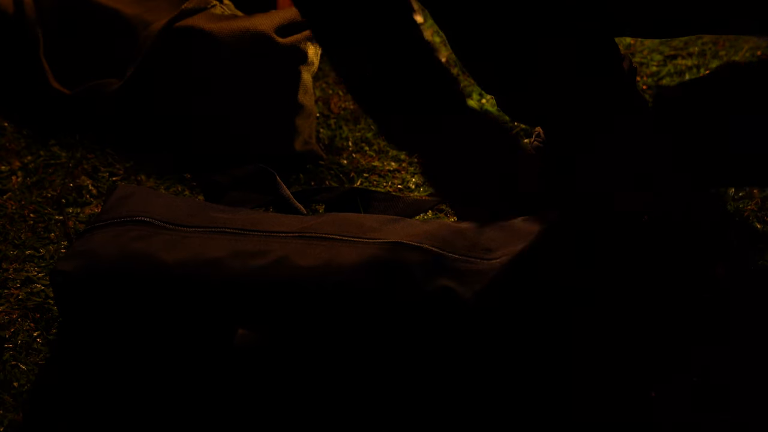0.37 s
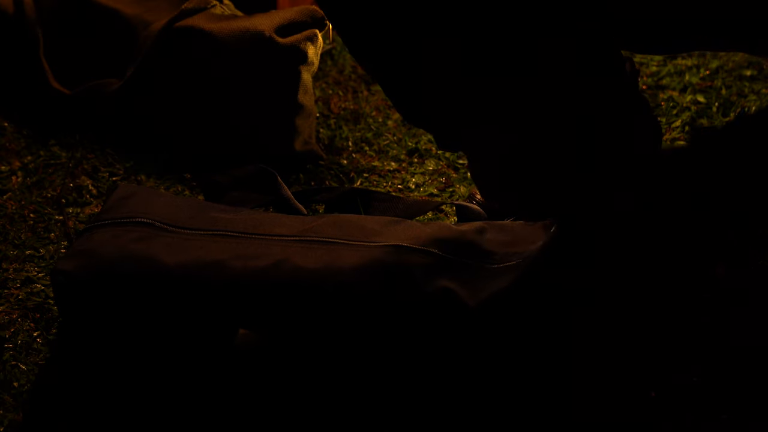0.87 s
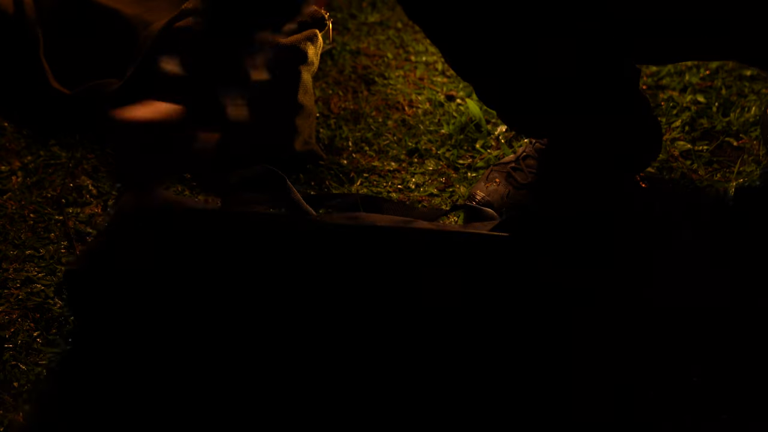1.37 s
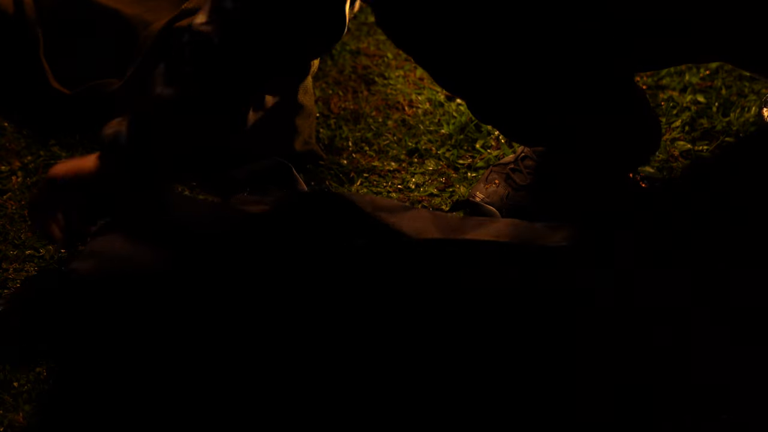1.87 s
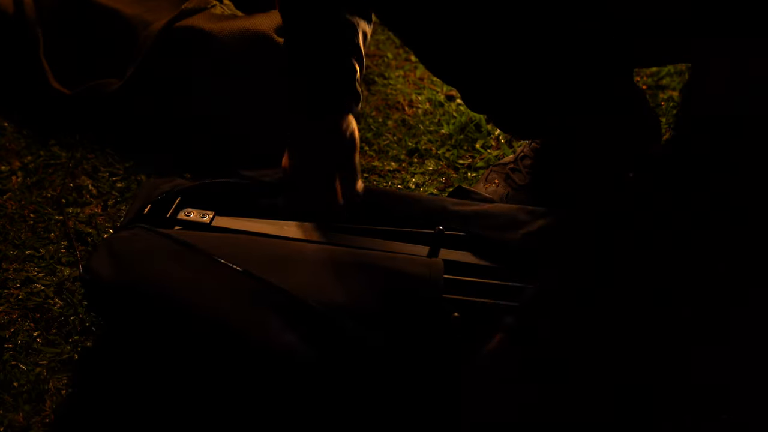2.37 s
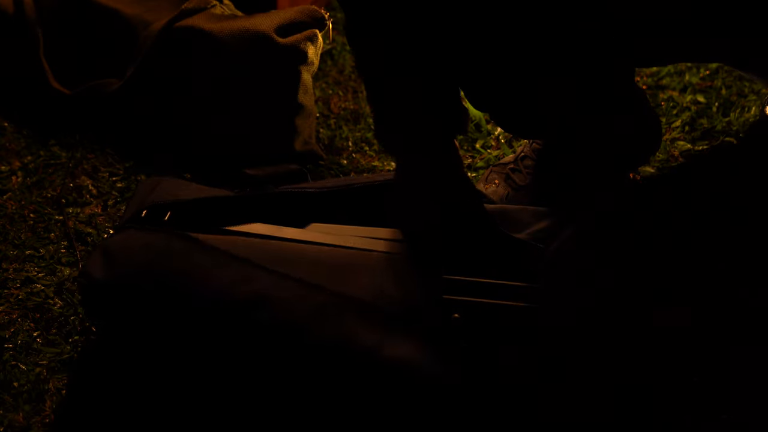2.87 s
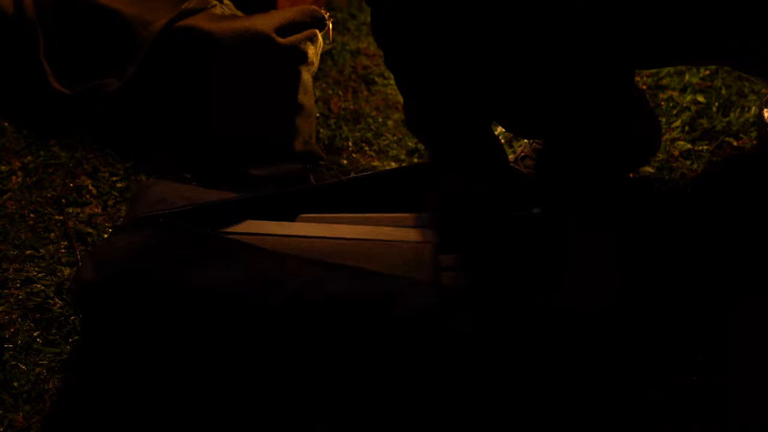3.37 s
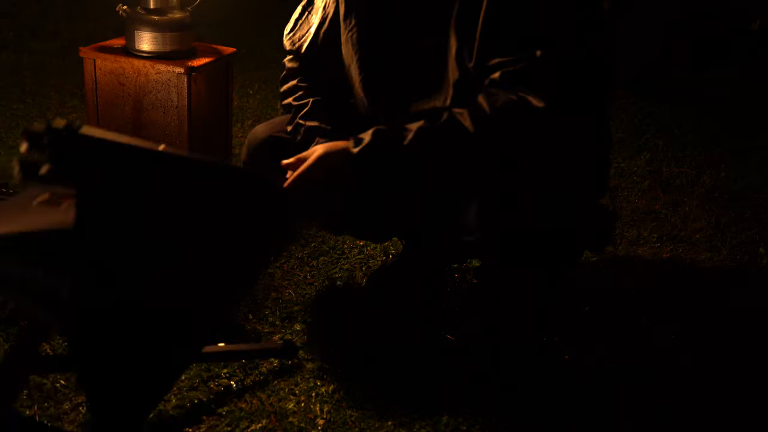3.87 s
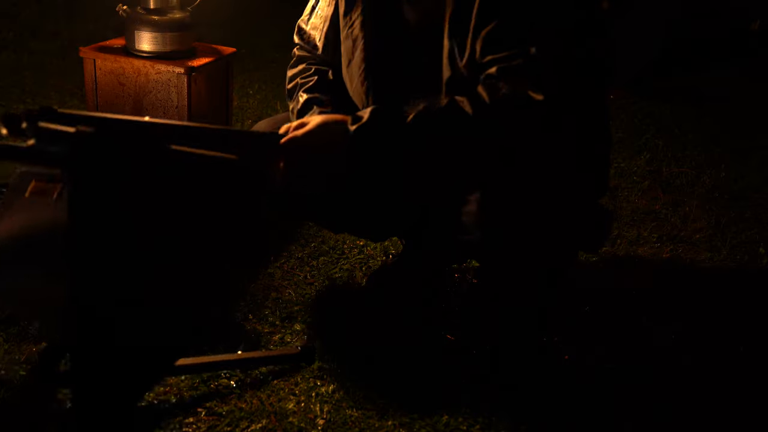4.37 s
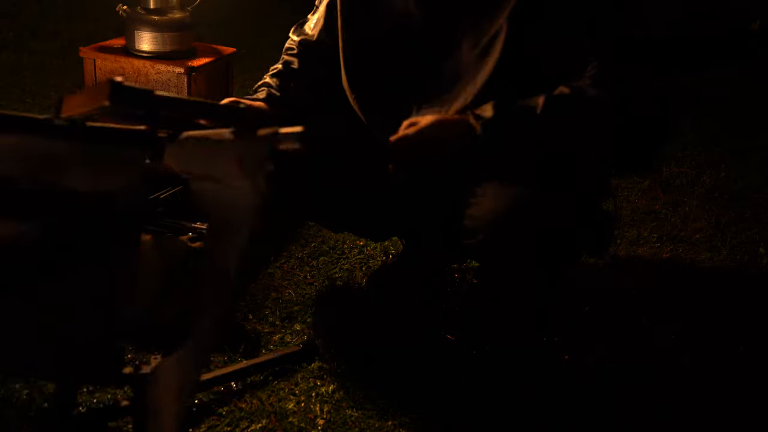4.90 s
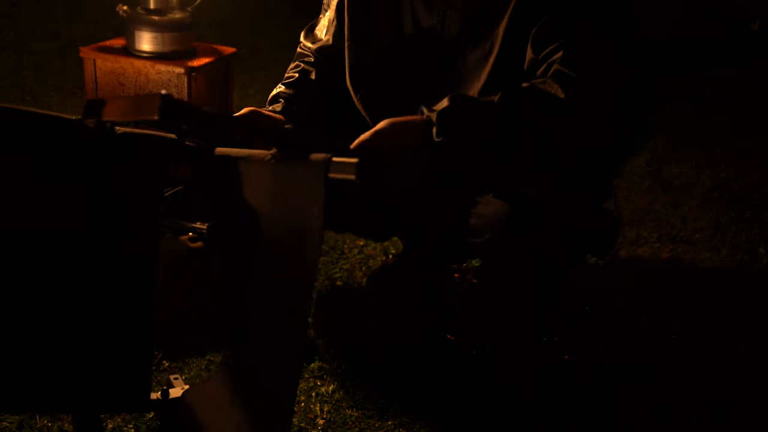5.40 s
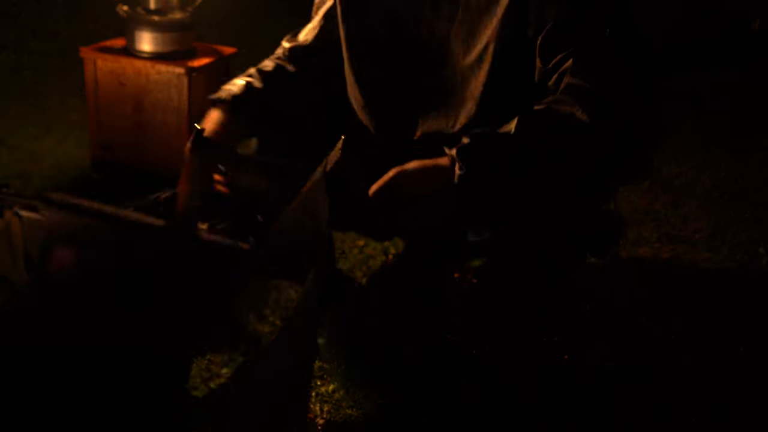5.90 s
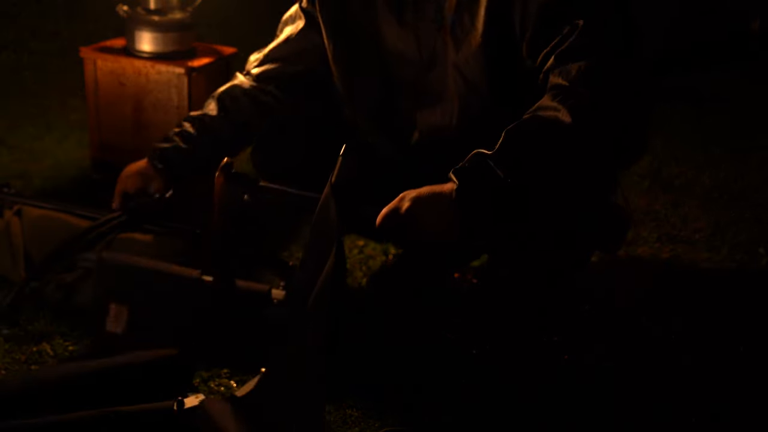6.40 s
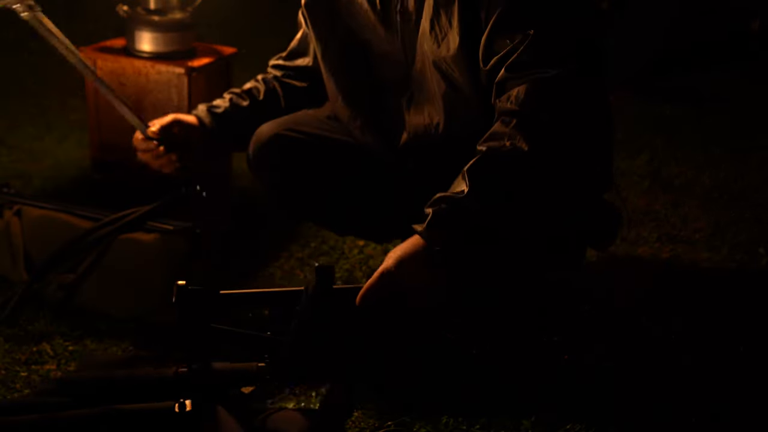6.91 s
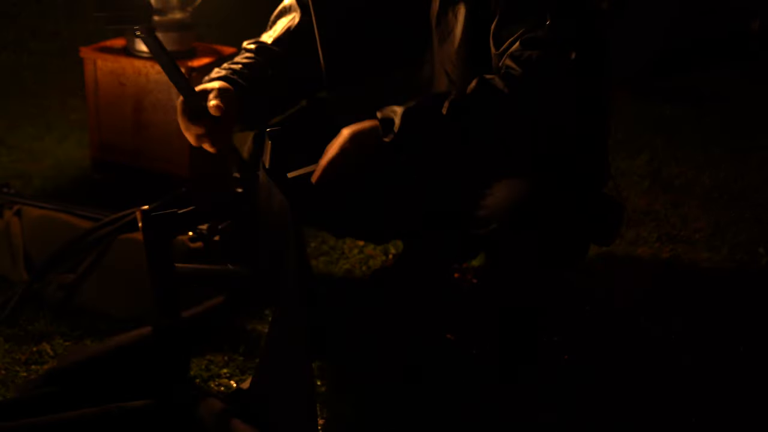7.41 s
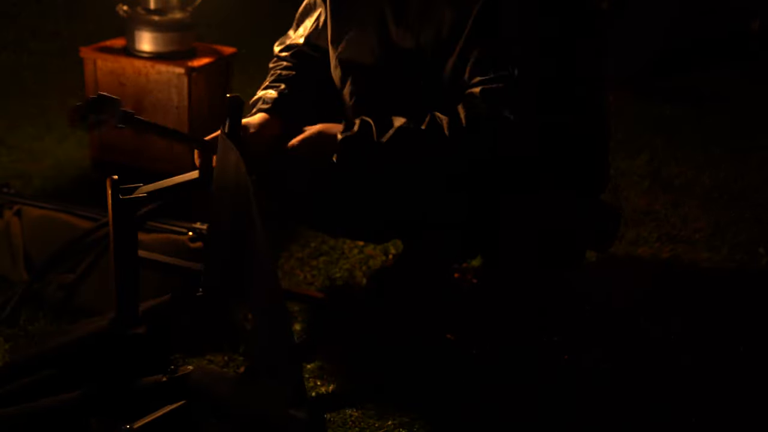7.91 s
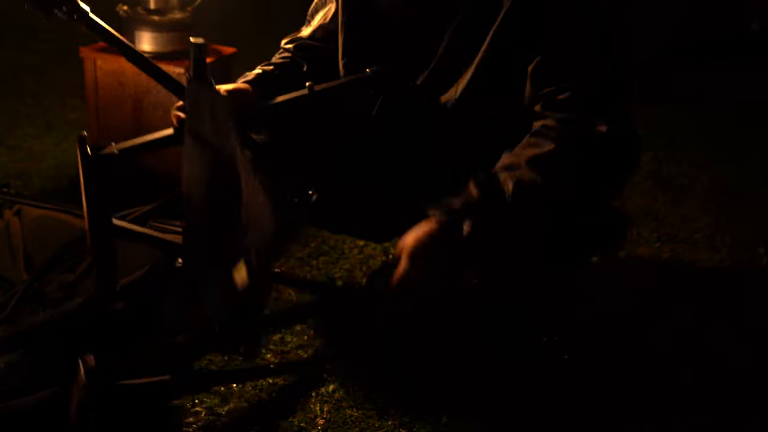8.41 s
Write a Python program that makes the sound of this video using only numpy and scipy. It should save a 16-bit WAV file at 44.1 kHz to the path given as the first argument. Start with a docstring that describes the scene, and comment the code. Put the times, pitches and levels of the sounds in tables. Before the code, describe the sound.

Quiet open night air with very faint, high trilling insects, everything close and dry. From 0.1 to 0.5 s a zip runs slowly with a low, uneven buzz and a tiny metallic tab tinkle; cloth rubs and a dull bump follows. At 1.1-1.5 s a faster zip climbs to a high whine and drops. Canvas rustles and flaps heavily from 1.2 to 4 s, with low drag rumbles. Metal pole knocks begin around 2 s, cluster sharply at 3.05 s and 3.6 s, with a heavy thump at 3.8 s. Loud ringing clacks at 4.1 s lead into a short chattering metal scrape until 4.3 s. Then it is calmer: soft rustles, bumps near 4.9 s, a bright clack at 5.4 s, another jolting scrape at 6.4-6.65 s, light knocks around 7.5-7.7 s, a crisp clack at 7.94 s, and a small tap at 8.3 s amid cloth.

```python
"""Camping gear at night

Camping gear is handled outdoors, close to a small microphone, over night air with faint insects.
Filtered noise and clicks make the air, the rubbing cloth and the gear dragged over the ground.
Tones and tooth clicks make two zips run along a canvas bag; dull bumps are short damped notes.
Metal chair poles knock together and scrape through their sockets: noise and ringing resonances."""
import sys
import numpy as np
from scipy import signal
from scipy.fft import rfft, irfft
from scipy.io import wavfile
from scipy.ndimage import uniform_filter1d

SR = 44100
rng = np.random.default_rng(int(sys.argv[2]) if len(sys.argv) > 2 else 0)


def log_audio(samples):
    """Write samples as a 16-bit WAV file to the path given in sys.argv[1]."""
    # one column per channel
    frames = np.atleast_2d(samples).T
    # limit to full scale, then quantise
    limited = np.clip(frames, -1, 1)
    pcm = np.round(limited * 32767).astype(np.int16)
    wavfile.write(sys.argv[1], SR, pcm)


def rack_gain(trim_db):
    """Turn a fader trim in dB into the linear factor to multiply a signal by."""
    fader = np.asarray(trim_db, float)
    return 10 ** (fader / 20)


N = 375732
TIME = np.arange(N) / SR

# colour of rubbing cloth, also of the crack of a blow: (frequency [Hz], gain [dB])
RUB_COLOUR = [(300, -32), (700, -4.5), (1000, 3), (2500, 3.5), (4400, 1.5), (5200, -18), (8000, -38.5)]
# colour of the flapping bag: (frequency [Hz], gain [dB])
FLAP_COLOUR = [(60, -26), (150, 0), (250, 4.5), (600, 4), (900, -0.5), (2000, -32)]
# colour of the cloth's hissing nap, also of the tick of a blow: (frequency [Hz], gain [dB])
NAP_COLOUR = [(2500, -37), (4500, 4.5), (5200, 10.5), (8000, 9), (11000, 5.5), (15000, 3.5)]
# the microphone port lifts the sound near 4 kHz and dulls what lies above: (frequency [Hz], gain [dB])
PORT_COLOUR = [(20, -7), (60, 7.5), (2600, 0), (4000, 6), (4400, -1), (4900, -7), (8000, -6), (16000, -3)]


def unit(x):
    """Scale to rms 1."""
    return x / np.sqrt(np.mean(x ** 2))


def colour(x, *spectra):
    """Causal filter whose gain follows (frequency [Hz], gain [dB]) points."""
    log_hz = np.log(np.maximum(np.fft.rfftfreq(2 ** 11, 1 / SR), 1))
    gain_db = 0
    for spectrum in spectra:
        hz, db = np.array(spectrum).T
        gain_db = gain_db + np.interp(log_hz, np.log(hz), db)
    # folding the cepstrum onto its first half gives the filter minimum phase
    cepstrum = irfft(np.log(rack_gain(gain_db)))
    cepstrum[1:2 ** 10] *= 2
    cepstrum[2 ** 10 + 1:] = 0
    impulse = irfft(np.exp(rfft(cepstrum)))
    return signal.fftconvolve(x, impulse)[:len(x)]


def ring(x, hz, width_hz):
    """One resonance, gain 1 at its centre."""
    return signal.lfilter(*signal.iirpeak(hz, hz / width_hz, SR), x)


def walk(rate):
    """Random levels held 1 / rate seconds and smoothed into slopes; spread near 1."""
    hold = int(SR / rate)
    steps = np.repeat(rng.standard_normal(N // hold + 1), hold)
    return 1.3 * uniform_filter1d(uniform_filter1d(steps, hold), hold)[:N]


def grit(rate, spread_db):
    """Scattered clicks, about rate per second, mostly small, a few large; rms 1."""
    chance = rng.random((3, N))
    size = rack_gain(-spread_db * np.log(1 - chance[1])) * np.sign(chance[2] - .5)
    return unit(size * (chance[0] < rate / SR))


def swells(rows, rest_db, quickness):
    """Level in dB of each layer: every gesture rises to its peak and falls away, over a level at rest."""
    peak_s, rise, fall, *layers = np.array(rows).T
    coarse = TIME[::32]
    since = coarse[:, None] - peak_s
    # rises and falls per 10 dB are kept between 3 ms and 1 s
    before = -since / np.clip(rise, .003, 1)
    after = since / np.clip(fall, .003, 1)
    away = np.where(since < 0, before, after)
    levels = []
    for db, rest, quick in zip(layers, rest_db, quickness):
        power = 10 ** (-quick * away) @ rack_gain(2 * db) + rack_gain(2 * rest)
        levels.append(np.interp(TIME, coarse, 10 * np.log10(power)))
    return levels


def night():
    """Soft air is coloured noise; distant insect choruses are narrow bands of trilling noise."""
    # colour of the night air: (frequency [Hz], gain [dB])
    air_colour = [(20, 3), (100, 0), (1000, -3), (4000, 1.5), (9000, -3), (16000, -17)]
    # insect choruses: (frequency [Hz], width [Hz], level [dB], trills per second [1/s])
    insects = [(8570, 420, -61, 28), (11600, 100, -64, 51)]
    out = rack_gain(-46) * unit(colour(rng.standard_normal(N), air_colour, PORT_COLOUR))
    for hz, width_hz, db, rate in insects:
        trill = np.maximum(np.sin(2 * np.pi * rate * TIME + 2 * walk(1.7)), .2)
        chorus = ring(ring(trill * rng.standard_normal(N), hz, width_hz), hz, width_hz)
        out = out + rack_gain(db + 1.6 * walk(2.1)) * unit(chorus)
    return out


def drag():
    """Gear dragged over the ground: low rumbling noise that swells with each pull."""
    # drags: (peak time [s], rise per 10 dB [s], fall per 10 dB [s], level [dB])
    drags = [(.11, .06, 0.5, -42.5), (.38, .08, -0.2, -39), (.666, 0.041, .03, -39), (1.1, 0.15, .1, -40),
             (1.324, .12, 0, -40), (1.48, .05, .05, -48), (1.7, 0.061, .25, -42), (2.2, 0.017, 0.1, -31),
             (2.29, 0.034, 0.07, -34), (2.5, .04, 0.2, -42), (3.006, 0.072, 0.08, -34),
             (3.278, .04, 0, -39), (3.39, 0.11, 0.2, -40.5), (3.616, 0.11, .05, -48),
             (3.824, .02, 0.2, -42), (4.1, .03, 0.2, -46), (4.655, 0.017, .12, -35), (4.9, 0.079, 0.2, -44),
             (5.1, 0.067, .03, -56), (5.47, 0.11, .05, -48), (5.85, 0.044, 0.2, -35), (5.92, .04, 0.5, -54),
             (6.16, .08, .06, -43), (6.508, .05, .1, -44), (6.74, 0.0091, -0.1, -48),
             (7.55, 0.13, 0.2, -45.5), (7.94, .01, .04, -51), (8.35, .02, 1.5, -55), (8.5, 0.13, .1, -52)]
    # level between drags: (level [dB])
    drag_rest = [-65]
    # colour of the rumble: (frequency [Hz], gain [dB])
    drag_colour = [(15, -25), (35, -5), (60, -4.5), (130, -3.5), (200, -5.5), (500, -48.5)]
    level_db, = swells(drags, drag_rest, [1])
    return rack_gain(level_db) * unit(colour(rng.standard_normal(N), drag_colour))


def cloth():
    """Fibres slip in dense grains; the slack bag flaps beneath them and stiff folds snap."""
    # rustles: (peak time [s], rise per 10 dB [s], fall per 10 dB [s],
    #           rub level [dB], flap level [dB], nap hiss level [dB]); times hold at quickness 1
    rustles = [(.11, 0.13, 0.4, -36, -36, -39.5), (.38, 0.17, 0.14, -33, -26, -38),
               (.5, 0.042, -0.2, -40, -46, -39.5), (.6, 0.059, 0.2, -43.5, -46, -40.5),
               (.666, 0.034, 0.5, -49, -42.5, -50), (.71, .04, 1, -44, -53, -43.5),
               (.82, .01, 0.3, -49, -37, -49), (.91, 0.14, .02, -36, -40, -37),
               (1.105, 0.029, 0.76, -45, -26.5, -56), (1.2, 0.099, 0.2, -29, -31, -46),
               (1.324, 0.15, 0.11, -28, -41, -29.5), (1.474, .05, .06, -25.5, -31, -40),
               (1.65, 0.095, 0, -35, -32, -52), (1.855, 0.063, 0.09, -29, -29.5, -28),
               (1.95, 0.11, 0.15, -32, -40, -36.5), (2.008, 0.0078, 0.01, -24.5, -23, -39),
               (2.1, 0.066, 0.2, -38, -38, -43.5), (2.158, .03, 0.2, -33.5, -28.5, -39),
               (2.31, 0.061, 0.18, -27, -27, -32), (2.47, .05, 0.15, -29.5, -32, -36),
               (2.575, 0.11, .04, -30.5, -43, -35), (2.78, 0.19, 0.6, -37, -39.5, -42),
               (2.856, 0.021, -0.12, -25.5, -29, -35), (2.91, 0.028, 0.3, -48, -45, -39),
               (3.015, 0.07, 0.15, -28.5, -25, -32), (3.108, 0.096, -0.02, -20.5, -27, -37),
               (3.158, 0.024, 0.6, -39, -52, -51), (3.275, 0.071, 0.07, -39, -30, -44),
               (3.39, 0.14, 0.36, -34, -38.5, -38), (3.472, 0.016, 0.13, -29, -35, -39.5),
               (3.616, 0.051, 0.1, -37, -28.5, -37), (3.7, 0.11, 0.08, -33.5, -40, -39.5),
               (3.824, 0.015, 0.1, -31, -32.5, -36), (4.088, 0.0062, 0, -40, -19.5, -30),
               (4.2, 0.075, .1, -39, -40, -52), (4.318, 0.095, -0.5, -40, -47, -63),
               (4.55, 0.035, 0.45, -44, -56, -44), (4.64, 0.027, 0.25, -37, -41, -45),
               (4.856, 0.055, 0.08, -36.5, -38, -36), (4.938, 0.092, -0.01, -34.5, -37, -34.5),
               (5.1, 0.11, 0.3, -44, -61, -46.5), (5.235, 0.027, .03, -42.5, -52, -42),
               (5.33, 0.13, 0.04, -41, -50.5, -34), (5.835, 0.047, 0.2, -37, -44, -41),
               (5.75, .15, .05, -45, -49, -46.5), (5.9, 0.12, 0.2, -34, -38, -35.5),
               (6.124, 0.11, 0.28, -41, -45, -44), (6.225, 0.022, .04, -36.5, -55, -54),
               (6.53, 0.23, 0.23, -40.5, -41, -49), (6.74, .006, 0.15, -35, -37, -37.5),
               (6.95, 0.22, .08, -40.5, -49, -42.5), (7.03, 0.069, .15, -42.5, -45, -38.5),
               (7.2, 0.14, 0.4, -45, -48, -55), (7.39, 0.1, 0.54, -33.5, -50.5, -34),
               (7.55, 0.05, 0.45, -39.5, -46, -47), (7.64, 0.046, .03, -32, -39, -38),
               (7.77, 0.085, 0.3, -41, -43.5, -34.5), (7.94, .004, 0.02, -25.5, -39, -25.5),
               (8.08, .15, .12, -37, -62.5, -39), (8.2, .1, .15, -36, -55, -42),
               (8.297, .02, -0.7, -42.5, -52, -47), (8.35, 0.016, .04, -42, -44, -40),
               (8.5, 0.078, 0, -34, -44, -36.5)]
    # the cloth never rests, levels between rustles: (rub [dB], flap [dB], nap [dB])
    stir = [-50.5, -52.5, -56.5]
    # how fast each layer comes and goes: (rub [ratio], flap [ratio], nap [ratio])
    quickness = [1., 1.7, 1.19]
    # stiff folds snap with short notes: (frequency [Hz], width [Hz], level over the rub [dB])
    fold_modes = [(450, 310, -12), (740, 510, -11), (1200, 370, -11.5), (2000, 1500, -13)]
    rub_db, flap_db, nap_db = swells(rustles, stir, quickness)
    grip = walk(35)  # shared by rub, nap and flap
    fibres = grit(5000, 2.4) + 0.75 * rng.standard_normal(N)
    rub = rack_gain(rub_db + 1.44 * grip) * unit(colour(fibres, RUB_COLOUR, PORT_COLOUR))
    nap = rack_gain(nap_db + 1.2 * grip + 2.6 * walk(50)) * unit(colour(fibres, NAP_COLOUR, PORT_COLOUR))
    flap = rack_gain(flap_db + 0.62 * grip + 1.0 * walk(25)) * unit(colour(grit(900, 2.47), FLAP_COLOUR))
    folds = sum(rack_gain(db) * unit(ring(grit(120, 2.5), hz, width_hz)) for hz, width_hz, db in fold_modes)
    return rub + nap + flap + rack_gain(rub_db) * folds


def thumps():
    """Gear bumps through canvas: a dull, quickly damped note under a soft crack."""
    # bumps: (time [s], relative body level [dB], body frequency [Hz], relative crack level [dB])
    bumps = [(0.15, -23, 180, -40), (0.466, -14.5, 204, -29), (0.503, -27, 474, -38),
             (0.814, -22, 308, -35), (0.968, -20, 613, -36), (1.034, -13, 368, -24.5), (1.1, -19, 670, -35),
             (1.744, -18.5, 660, -33), (1.796, -21, 315, -40), (2.0, -17, 410, -17), (2.205, -21, 253, -39),
             (2.255, -18.5, 740, -25), (2.321, -14.5, 256, -11), (2.85, -16, 900, -19),
             (2.952, -22, 646, -32), (2.989, -27, 390, -27.5), (3.015, -11.5, 407, -6.5),
             (3.214, -18.5, 450, -33), (3.264, -10.5, 642, -11), (3.398, -25, 250, -27),
             (3.474, -17, 1084, -32), (3.612, -20.5, 202, -21), (3.814, -4.5, 1010, -8),
             (3.838, -15, 257, -36), (4.084, -12, 333, -30), (4.085, -8.5, 693, -7), (4.638, -26, 134, -23),
             (4.926, -18.5, 610, -20.5), (5.318, -24, 588, -22), (5.382, -22, 180, -40),
             (5.382, -14, 1340, -21), (5.818, -21.5, 121, -36), (5.88, -17, 775, -31),
             (5.919, -20, 230, -35), (5.964, -18, 1520, -36), (6.107, -21, 216, -18),
             (6.17, -17, 1220, -31), (6.54, -21.5, 203, -43), (6.737, -16, 1010, -30),
             (7.158, -27, 1200, -20), (7.61, -24, 604, -33), (7.66, -21, 1290, -32.5),
             (7.688, -16.5, 1130, -30.5), (7.73, -26, 497, -39.5), (7.935, -12, 923, -24),
             (8.295, -21.5, 1230, -28), (8.343, -28, 190, -41)]
    out, t = np.zeros(N + SR), np.arange(SR // 6) / SR
    push = 1 - np.exp(-(t / 0.0032) ** 4)  # soft contact: the force builds up
    for s, body_db, body_hz, crack_db in bumps:
        # a 300 Hz note falls by 60 dB in 39 ms; higher notes die sooner
        fade = np.exp(-np.log(1000) * t / 0.039 * (body_hz / 300) ** 0.19)
        noise = rng.standard_normal((2, len(t)))
        body = np.sin(2 * np.pi * body_hz * t) + 0.42 * unit(colour(noise[0], FLAP_COLOUR))
        crack = unit(colour(noise[1], RUB_COLOUR, PORT_COLOUR)) * fade
        i = int(s * SR)
        out[i:i + len(t)] += (1.29 * rack_gain(body_db) * body + 2.1 * rack_gain(crack_db) * crack) * fade * push
    return out[:N]


def pull():
    """The small metal tab knocks on the zip's slider and rings very high, as a sum of fading sines."""
    # knocks of the tab: (time [s], level [dB])
    tinkles = [(0.092, -48), (0.128, -36), (0.14, -42), (0.205, -46)]
    # notes of the tab: (frequency [Hz], level [dB], time to fall by 60 dB [s])
    pull_modes = [(7900, -4, .03), (10800, -6, .2), (12450, -6, .13), (14700, -10, .12), (15700, 4, .15)]
    out, t = np.zeros(N), np.arange(SR // 5) / SR
    note = 0
    for hz, db, t60 in pull_modes:
        note = note + rack_gain(db) * np.sin(2 * np.pi * hz * t) * np.exp(-np.log(1000) * t / t60)
    for s, db in tinkles:
        out[int(s * SR):][:len(t)] += rack_gain(db) * note
    return out


def play(run):
    """Columns of a curve at every sample, and a gate that is open while it lasts."""
    s, *columns = np.array(run).T
    gate = uniform_filter1d(1. * (TIME > s[0]) * (TIME < s[-1]), size=200)
    return gate, [np.interp(TIME, s, column) for column in columns]


def zipper(run, tooth, slider, per_order_db, uneven, rough_db):
    """The slider passes tooth after tooth: a tone at the tooth rate and a click for each tooth."""
    gate, (rate, tone_db, click_db) = play(run)
    phase = np.cumsum(rate * gate * (1 + uneven * walk(250))) / SR  # teeth passed so far
    slider_hz, slider_db = np.array(slider).T
    tone = 0
    for order in range(1, 4):
        resonance_db = np.interp(np.log(order * rate), np.log(slider_hz), slider_db)
        order_db = tone_db + (order - 1) * per_order_db + resonance_db + rough_db * walk(200)
        tone = tone + rack_gain(order_db) * np.sqrt(2) * np.sin(2 * np.pi * order * phase)
    # each tooth snaps in with its own force and rasps briefly after
    force = rack_gain(rough_db * rng.standard_normal(N // 20))[phase.astype(int)]
    since = (phase % 1) / rate
    rasp = 0.17 * np.exp(-since / 0.003) * rng.standard_normal(N)
    snap = force * (np.exp(-since * SR / 3.0) + rasp)
    clicks = colour(gate * snap, tooth, PORT_COLOUR)
    # even out the clicks so that the click level sets their strength
    power = uniform_filter1d(clicks ** 2, size=2000) + 1e-9
    return gate * (tone + rack_gain(click_db) * clicks / np.sqrt(power))


def slow_zip():
    """A slow zip run: its tooth rate gives a low buzz."""
    # the run: (time [s], mean teeth per second [1/s], tone level before resonance [dB], click level [dB])
    slow_run = [(0.09, 93, -45, -33), (0.156, 76, -42, -30.5), (0.188, 51, -52, -43), (0.244, 97, -47, -37),
                (0.264, 175, -37, -37), (0.284, 288, -27, -29), (0.306, 317, -20.5, -28),
                (0.352, 290, -22, -31), (0.388, 203, -17.5, -36), (0.414, 171, -25, -33),
                (0.43, 120, -30, -37), (0.52, 36, -43, -50)]
    # colour of one tooth click: (frequency [Hz], gain [dB])
    slow_tooth = [(100, -15), (300, -10), (700, 7), (1300, 0), (1800, 8), (3000, -4), (6000, -5),
                  (15000, -3)]
    # resonances of slider and tape: (frequency [Hz], gain [dB])
    slow_slider = [(60, -11), (200, -13), (300, -8.5), (420, -4.5), (600, 0), (900, -5), (1500, -18)]
    return zipper(slow_run, slow_tooth, slow_slider, per_order_db=-1.5, uneven=.045, rough_db=2.8)


def fast_zip():
    """A fast zip run: its tooth rate climbs to a high whine and drops again."""
    # the run: (time [s], mean teeth per second [1/s], tone level before resonance [dB], click level [dB])
    fast_run = [(1.09, 134.2, -40, -49), (1.112, 196.2, -34, -54), (1.135, 270.7, -25.5, -39),
                (1.164, 433, -29.5, -23.5), (1.19, 561.3, -20, -20.5), (1.224, 691, -20.5, -26),
                (1.252, 733, -25, -23.5), (1.27, 864, -20.5, -26), (1.296, 1053, -16, -22.5),
                (1.316, 1177, -13, -25), (1.335, 1266, -22.5, -25), (1.352, 1364, -21, -24),
                (1.378, 1380, -24, -17.5), (1.402, 1314, -20.5, -15.5), (1.414, 1205, -18, -17),
                (1.43, 1082, -22, -21), (1.464, 668, -28, -24.5), (1.484, 529.5, -28, -39),
                (1.498, 437, -23, -35), (1.52, 402, -34, -36.5), (1.56, 329.4, -38, -57),
                (1.606, 345, -39.5, -62), (1.632, 361, -34, -42), (1.655, 373, -36, -46)]
    # colour of one tooth click: (frequency [Hz], gain [dB])
    fast_tooth = [(100, -15), (400, -15), (1000, -13), (1800, -7.5), (3000, -0.5), (6000, 3),
                  (15000, -18.5)]
    # resonances of slider and tape: (frequency [Hz], gain [dB])
    fast_slider = [(150, -10), (500, 2), (750, -5.5), (1000, -2.5), (1300, -2.5), (1450, 5), (1900, -10),
                   (2300, -9), (2650, 7), (3300, -14), (4000, 11), (4600, 13)]
    return zipper(fast_run, fast_tooth, fast_slider, per_order_db=-5, uneven=.023, rough_db=4.0)


def pole_body(x, rasp, modes, grips):
    """The pole answers a push with a raw rasp and its ringing modes."""
    out = colour(x, rasp)
    for grip, (hz, width_hz, db) in zip(grips, modes):
        out = out + rack_gain(db) * ring(x * grip, hz, width_hz)
    return out


def scrapes():
    """A pole chatters through its socket: dense clicks and a few clear jolts ring the pole's modes."""
    # strokes: (peak time [s], rise per 10 dB [s], fall per 10 dB [s],
    #           main level [dB], shrill level [dB], dull level [dB])
    strokes = [(4.112, 0.011, 0.0415, -11, -27, -15.5), (4.205, 0.0074, 0.0456, -20, -43, -33),
               (4.228, 0.017, .015, -13, -38, -23.5), (4.244, 0.018, .015, -8.5, -27.5, -15.5),
               (4.308, .004, 0.03, -18.5, -51, -36), (6.444, 0.014, -0.01, -17.5, -26.5, -27),
               (6.478, 0.038, -0.03, -31.5, -46.5, -27), (6.54, 0.026, 0.0467, -15, -29.5, -25.5),
               (6.576, .012, -0.01, -24, -38, -22), (6.62, 0.011, 0.016, -13, -36.5, -27),
               (6.638, .012, 0.0049, -19, -37, -25.5)]
    # levels between strokes: (main [dB], shrill [dB], dull [dB])
    scrape_rest = [-120, -120, -120]
    # clear jolts within the scrapes: (time [s], relative level [dB])
    jolts = [(4.2047, -25), (4.2177, -10), (4.2414, -3.5), (4.3044, -9), (6.439, -22), (6.46, -21),
             (6.5183, -17.5), (6.5354, -13), (6.575, -23), (6.616, -3.5)]
    # modes of the pole: (frequency [Hz], width [Hz], gain [dB])
    pole_modes = [(1525, 76, -16), (1710, 68, -32.5), (2053, 87, -3.5), (2380, 110, 0), (3206, 28.5, 18),
                  (3610, 57, -28), (4142, 43, 12.5), (4420, 74, -30), (4740, 15, -31), (4850, 20, -22),
                  (5850, 29, -9), (6100, 83, -32), (6510, 54, -52), (6750, 25, -11), (6910, 16, -47),
                  (8810, 39, -40), (9100, 31, -48), (10000, 60, -28), (10200, 17, -36), (12500, 43, -22),
                  (12600, 320, -21), (13600, 38, -30)]
    # raw noise under the low modes: (frequency [Hz], gain [dB])
    dull_rasp = [(400, -56), (1200, -17), (2200, -28), (3200, -20), (5000, -51)]
    # raw noise under the middle modes: (frequency [Hz], gain [dB])
    main_rasp = [(1500, -26), (2800, -3.5), (4200, -3), (5000, -16), (8000, -52)]
    # the close cluster of the top modes, as noise: (frequency [Hz], gain [dB])
    shrill_rasp = [(4000, -78), (5500, -42), (7000, -57), (11000, -34), (12300, -31), (14000, -37),
                   (15800, -42), (16400, -55)]
    main_db, shrill_db, dull_db = swells(strokes, scrape_rest, [1, 1, 1])
    chatter = (grit(7600, 1.1) + .5 * rng.standard_normal(N)) * rack_gain(0.56 * walk(150))
    push = rack_gain(main_db) * chatter
    jolt = np.exp(-np.arange(SR // 50) / SR / 0.0047)
    for s, db in jolts:
        push[int(s * SR):][:len(jolt)] += 0.74 * rack_gain(db) * jolt * rng.standard_normal(len(jolt))
    out = 0
    # mode groups: from Hz, to Hz, noise colour, level over the main one in dB
    for lo_hz, hi_hz, rasp, share_db in [(0, 2700, dull_rasp, dull_db - main_db),
                                         (2700, 4700, main_rasp, 0),
                                         (4700, 16000, shrill_rasp, shrill_db - main_db)]:
        modes = [mode for mode in pole_modes if lo_hz <= mode[0] < hi_hz]
        # the grip shifts along the pole, so each mode is driven now harder, now softer
        grips = [rack_gain(1.8 * walk(30)) for _ in modes]
        scraped = pole_body(push * rack_gain(share_db), rasp, modes, grips)
        out = out + scraped / np.std(pole_body(chatter, rasp, modes, grips))
    return out


def clacks():
    """Pole on pole: a crack, a bright tick, and the frame's modes near the struck note ring on."""
    # blows: (time [s], relative crack level [dB], struck note [Hz], relative tick level [dB],
    #         damping [ratio, 1 = plain ring, less rings longer])
    blows = [(2.0039, -7.5, 3000, -43, 1.05), (2.3017, -8, 3160, -45, 1.4), (2.5721, -11, 3350, -32, 1.5),
             (2.7748, -15.5, 3570, -27, 1.3), (2.7874, -25, 3530, -29, 2.8), (2.9898, -14, 1260, -46, 0.72),
             (3.0595, -1, 3500, -35, 1.1), (3.0726, 0.5, 3740, -36, 0.77), (3.0856, -3, 4190, -32, 1),
             (3.1044, -10, 1010, -38, 1.2), (3.205, -22.5, 2420, -40, 0.95),
             (3.4767, -15.5, 1170, -39, 0.88), (3.6185, -0.5, 3630, -19.5, 0.89),
             (3.627, -1.5, 3600, -25, 1.3), (3.6366, 0.5, 3400, -20, 0.85), (3.6381, -11, 2300, -50, 0.7),
             (3.6444, 2.5, 2300, -19, 2.4), (3.6451, -13, 1010, -50, 0.47), (3.656, -2, 2300, -24.5, 1.1),
             (3.7, -19, 3920, -44, 1.8), (3.71, -16, 3980, -42, 1.2), (3.7984, -24, 1560, -51, 1.1),
             (3.8174, -2, 1010, -34, 1.9), (4.0906, 3, 3600, -34, 1.6), (4.1081, 1.5, 2050, -42, 1.3),
             (4.1168, -9, 2390, -36, 1.), (4.127, -12, 2380, -42, .93), (4.1383, -16, 3190, -45, 1.1),
             (4.9277, -16.5, 1350, -36.5, 1), (5.323, -21, 2800, -40, 0.91), (5.3845, -1, 3850, -30.5, 1.5),
             (6.111, -19, 4020, -31, 2.5), (6.2048, -15, 3280, -45.5, .83), (6.4054, -9, 3320, -35, 1),
             (7.4653, -16.5, 3720, -39, 1.1), (7.6893, -12.5, 1080, -41, 1.9), (7.9378, 0, 3860, -25, 0.93),
             (7.9479, -5, 2100, -38.5, 1.6), (8.0197, -21, 2100, -41, 1.3), (8.2995, -18.5, 1200, -54, 2.2)]
    # modes of the bundled frame: (mean frequency [Hz], width at damping 1 [Hz], gain [dB])
    frame_modes = [(1010, 19, -8), (1270, 50, -5), (1560, 80, -1), (2120, 22, 1.5), (2300, 19.3, -0.5),
                   (2560, 22, -3), (2820, 52, -1.5), (3200, 36, -4.5), (3580, 57, -3.5), (3850, 170, 1),
                   (4140, 28, -4), (4900, 42, -13), (5420, 38, -17), (5800, 90, -15), (6570, 58, -15.5),
                   (8190, 110, -13), (9920, 130, -18), (12400, 80, -17.5), (12900, 56, -19),
                   (13600, 66, -29), (14200, 44, -22)]
    out, t = np.zeros(N + SR), np.arange(SR // 6) / SR
    hz, width_hz, db = np.array(frame_modes).T[:, :, None]
    high = hz[:, 0] > 4700  # these modes ring with the tick, the others with the crack
    snap = np.exp(-t / 0.00097)  # hard first contact
    fade = np.exp(-np.log(1000) * t / 0.049)
    for s, crack_db, note_hz, tick_db, damping in blows:
        damping = np.clip(damping, .4, 8)
        # the ring loses 4.5 dB for each doubling of the damping
        ring_db = 1.5 - 4.5 * np.log2(damping)
        noise = rng.standard_normal((2, len(t)))
        # every blow lands elsewhere and wakes the modes differently
        strike = rng.standard_normal((2, len(hz), 1))
        wave = np.sin(2 * np.pi * hz * (1 + 0.0073 * strike[1]) * t)
        modes = rack_gain(2.2 * strike[0]) * wave * np.exp(-np.pi * damping * width_hz * t)
        # modes weaken by 45 dB for each octave away from the struck note
        weight = rack_gain(db - 45.0 * np.abs(np.log2(hz / note_hz)))[~high]
        low_ring = (weight / weight.max() * modes[~high]).sum(axis=0)
        high_ring = (rack_gain(db) * modes)[high].sum(axis=0)
        crack = unit(colour(noise[0], RUB_COLOUR, PORT_COLOUR)) * fade * (1 + 1.36 * snap)
        crack = crack + rack_gain(ring_db) * low_ring
        tick = unit(colour(noise[1], NAP_COLOUR, PORT_COLOUR)) * fade * (1 + 3.0 * snap)
        tick = tick + rack_gain(ring_db + 15) * high_ring
        i = int(s * SR)
        out[i:i + len(t)] += 0.27 * rack_gain(crack_db) * crack + 0.95 * rack_gain(tick_db) * tick
    return out[:N]


def scene():
    """Everything close and dry, under the open sky."""
    soft = night() + drag() + cloth() + thumps()
    zips = slow_zip() + fast_zip() + pull()
    poles = scrapes() + clacks()
    return (soft + zips + poles)[None]


def band_limit(x):
    """A steep low-pass at the top of the band."""
    return signal.sosfilt(signal.butter(12, 16990, fs=SR, output="sos"), x)


def record(dry):
    """Loud peaks are rounded off and the top above 15.8 kHz is cut."""
    rounded = np.tanh(0.95 * dry) / 1.165
    top_cut = signal.ellip(8, .2, 60, 15800, fs=SR, output="sos")
    mix = signal.sosfilt(top_cut, rounded)
    return band_limit(mix)


dry = scene()
out = record(dry)
log_audio(out)
```